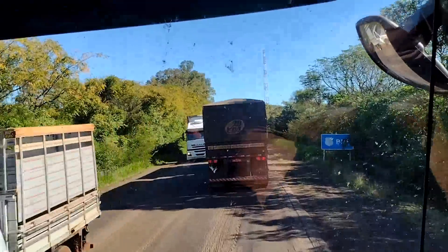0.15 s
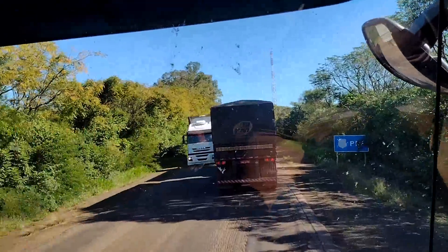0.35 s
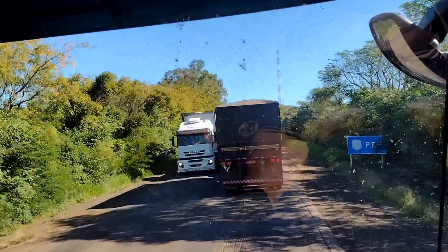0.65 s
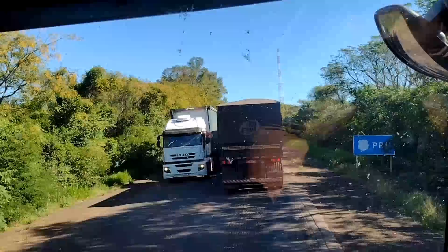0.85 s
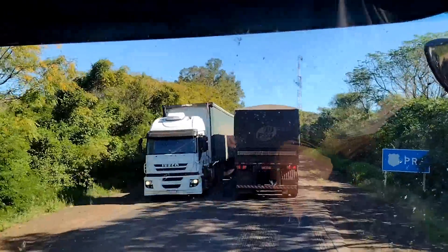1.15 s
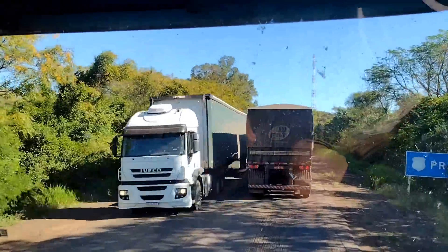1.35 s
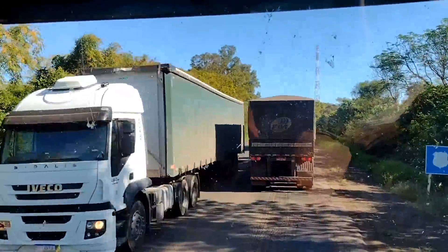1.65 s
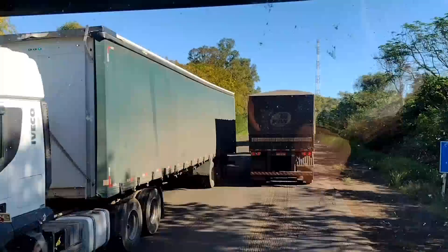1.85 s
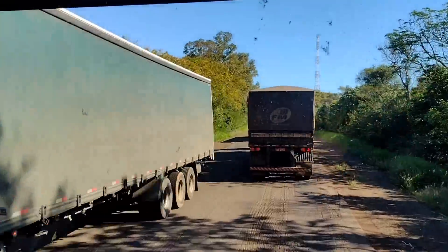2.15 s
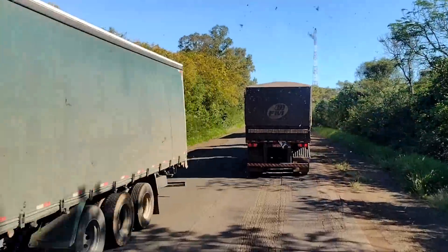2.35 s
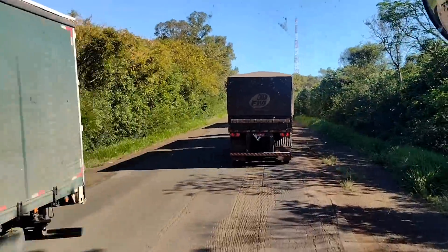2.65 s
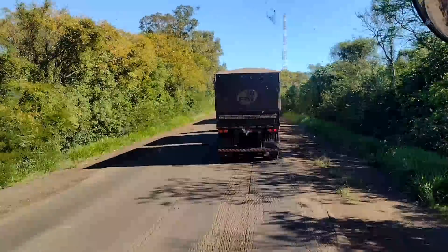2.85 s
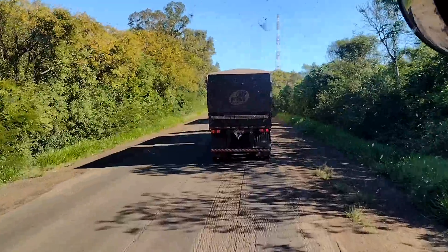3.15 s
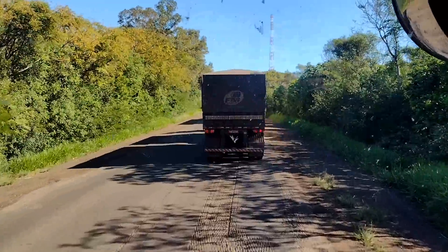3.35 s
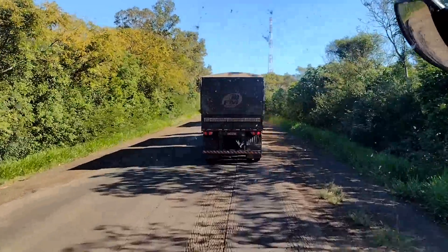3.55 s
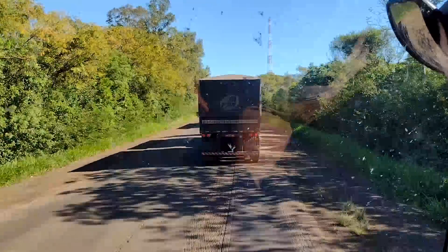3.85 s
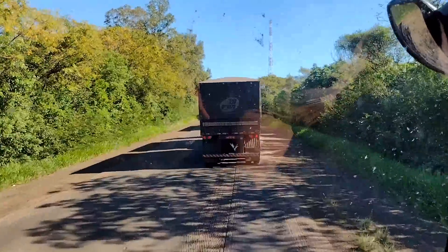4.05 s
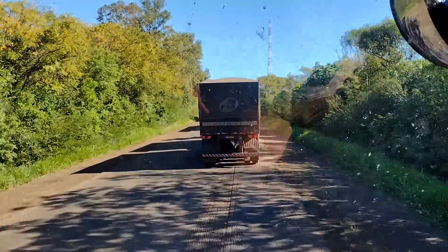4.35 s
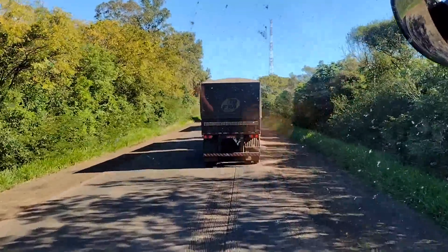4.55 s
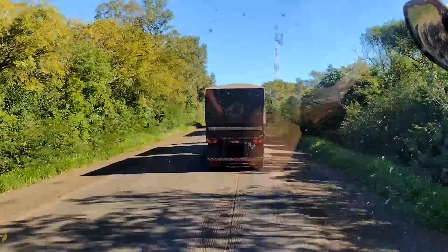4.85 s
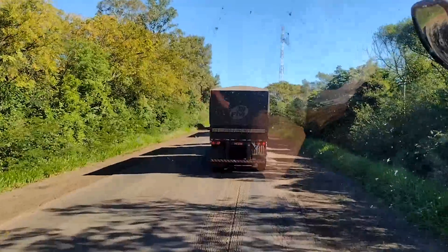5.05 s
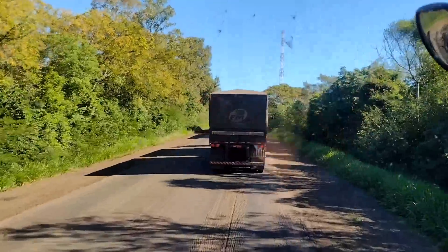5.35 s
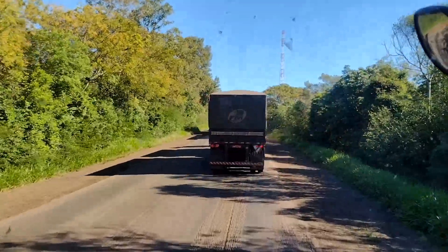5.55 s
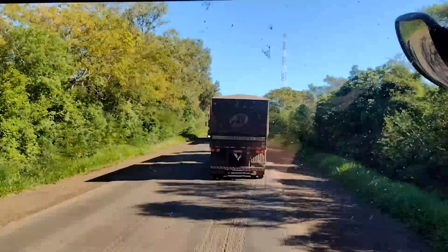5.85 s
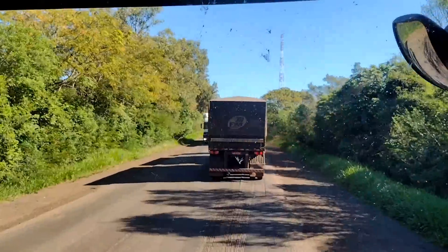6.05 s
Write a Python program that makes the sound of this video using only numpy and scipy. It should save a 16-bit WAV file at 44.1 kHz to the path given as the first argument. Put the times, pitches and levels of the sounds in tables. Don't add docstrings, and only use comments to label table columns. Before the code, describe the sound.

Deep diesel droning fills a truck cab, with rumbling floor, buzzing panels and constant faint trim chatter. An oncoming pickup sweeps by, then the engine coasts more thinly as a big truck and its trailer pass in airy roars. Power comes back with a low lurch, faint gear whine and rising pitch, punctuated by hard clicks, dull knocks and grit pings, calming to small ticks. Recorded in stereo inside the cab.

```python
import sys
import numpy as np
from scipy import signal
from scipy.fft import rfft, irfft, next_fast_len
from scipy.io import wavfile
from scipy.ndimage import uniform_filter1d, map_coordinates

SR = 44100
rng = np.random.default_rng(int(sys.argv[2]) if len(sys.argv) > 2 else 0)


def attenuation_scalar(level_db):
    decades = np.asarray(level_db, float) / 20
    return 10 ** decades


def store_pcm(level_fs):
    pcm = np.round(np.clip(level_fs, -1, 1) * 32767).astype(np.int16)
    wavfile.write(sys.argv[1], SR, np.atleast_2d(pcm).T)


N = 273861

# pitch_hz [Hz], level_db [dB per Hz]
TRIM = [(1530, -48.5), (2600, -13.5), (2790, -22), (3650, -4.5), (6250, -6.5), (8240, -2), (10100, 1.5),
        (11200, -1.5), (15200, -5.5), (16300, -27)]
LIFT_S, PRESS_S, PEDAL_S = 1.54, 3.37, 0.022


def unit(x):
    return x / np.sqrt(np.mean(x ** 2) + 1e-20)


def clock():
    return np.arange(N) / SR


def along(points, hz):
    f, v = np.transpose(points)
    return np.interp(np.log(hz + 1), np.log(f + 1), v)


def curves(rows):
    s, *cols = np.transpose(rows)
    return [np.interp(clock(), s, c) for c in cols]


def wobble(rate):
    knots = rng.standard_normal(int(N * rate / SR) + 4)
    return map_coordinates(knots, [np.arange(N) * rate / SR])


def filtered(x, response):
    m = next_fast_len(x.shape[-1] + 4096)
    spectrum = rfft(x, m) * response(np.fft.rfftfreq(m, 1 / SR))
    return irfft(spectrum, m)[..., :x.shape[-1]]


def peak(hz, centre_hz, width_hz):
    return 1j * hz * width_hz / (centre_hz ** 2 - hz ** 2 + 1j * hz * width_hz)


def resonance(centre_hz, width_hz):
    return lambda hz: peak(hz, centre_hz, width_hz) ** 2


def colour(points):
    return lambda hz: attenuation_scalar(along(points, hz))


def ports(gain, count, patchy_db=0):
    # pitch_hz [Hz], likeness [0-1]
    alike = [(60, 0.99), (130, 0.99), (290, 0.69), (640, 0.79), (1400, 0.26), (3100, 0.048), (15000, 0.12)]
    lag_s = 0.0003906
    z = signal.stft(rng.standard_normal((2, count + 512)), nperseg=256)[2]
    field = uniform_filter1d(rng.standard_normal(z.shape[1:]), size=5, axis=0)
    field = uniform_filter1d(field, size=12, axis=1)
    pair = signal.istft(z * attenuation_scalar(patchy_db * unit(field)), nperseg=256)[1]

    def share(hz):
        turn = np.arccos(np.clip(along(alike, hz), -1, 1)) / 2
        return gain(hz) * [np.cos(turn), np.sin(turn)]

    def delay(hz):
        return np.exp(-2j * np.pi * hz * lag_s * hz ** 2 / (hz ** 2 + 330 ** 2))

    common, differing = filtered(pair, share)
    late = filtered(common - differing, delay)
    return unit(np.array([common + differing, late])[:, 256:256 + count])


def place(out, s, sound):
    start = round(s * SR)
    out[:, start:start + sound.shape[1]] += sound


def throttle():
    return 1 - np.interp(clock(), [LIFT_S, LIFT_S + PEDAL_S, PRESS_S - PEDAL_S, PRESS_S], [0, 1, 1, 0])


def passing():
    # alongside_s [s], gone_s [s], approach [dB/s], leaving [dB/s], roar_db [dB]
    passes = [
        (.64, .74, 26, 28, -46.5),
        (2.19, 2.44, 94, 30, -50),
        (2.7, 3.0, 25, 55, -52),
    ]
    t, power = clock(), 0
    for near, gone, up, down, db in passes:
        level_db = db + 1.0 - up * np.maximum(near - t, 0) - down * np.maximum(t - gone, 0)
        power = power + attenuation_scalar(level_db) ** 2
    return np.sqrt(power)


def engine():
    # time_s [s], firing_hz [Hz], boom_db [dB]
    firing = [(0.0, 50.57, -22.5), (0.6, 50.94, -20), (1.15, 50.05, -21), (1.42, 51.16, -22),
              (1.56, 47.5, -26.5), (1.7, 45.03, -22.5), (1.99, 48.34, -29.5), (2.15, 47.96, -23),
              (2.42, 48.64, -30), (2.78, 47.44, -25.5), (3.3, 46, -27.5), (3.44, 51.4, -15.5),
              (3.51, 53.42, -22.5), (3.8, 55.32, -25), (4.25, 55.98, -22.5), (4.65, 57.06, -16.5),
              (5.4, 57.52, -16), (6.21, 59.27, -17)]
    # multiple [of firing rate], level_db [dB under the 2nd order]
    uneven = [
        (.5, -29.5),
        (1.5, -17),
        (2.5, -19),
        (4, -29),
    ]
    # from_s [s], in_step_s [s], slower [share], level_db [dB]
    shaft = [
        (0, 0.937, 0.092, -31),
        (1.5, 2.085, 0.1, -40.5),
        (3.394, 3.978, .095, -36),
    ]
    cab_hz = 52.5
    full_s, full_db = 4.3, 2
    t = clock()
    hz, first_db = curves(firing)
    phase = 2 * np.pi * np.cumsum(hz + 0.26 * wobble(9)) / SR + np.pi / 2
    lag = (hz - 53.5) / 4
    changes_s = [row[0] for row in shaft[1:]]
    gear = np.searchsorted(changes_s, t)
    engaged = np.prod([np.clip(abs(t - s) / PEDAL_S, 0, 1) for s in changes_s], axis=0)
    slip = np.choose(gear, [share * (phase - phase[round(s * SR)]) for _, s, share, _ in shaft])
    shaft_db = np.take([row[3] for row in shaft], gear)
    coast = 1 - throttle()
    jolt = np.exp(-((t - PRESS_S - .03) / 0.051) ** 2)
    below_hz = np.minimum(hz - cab_hz, 0)
    second_db = first_db - 10.5 + 2.5 * below_hz - 19 * coast
    second_db += (1.3 - 0.38 * below_hz) * engaged * np.cos(slip + 0.52)
    second_db -= full_db * np.interp(t, [full_s - PEDAL_S, full_s + PEDAL_S], [1, 0])
    third_db = -44 - 14.5 * coast + 10.5 * jolt
    boom = attenuation_scalar(first_db + (-1.27 + 1.5 * coast) * wobble(30)) * np.cos(phase)
    boom += attenuation_scalar(shaft_db) * engaged * np.cos(phase - slip)
    boom += attenuation_scalar(second_db + 0.28 * wobble(24)) * np.cos(2 * phase - lag)
    boom += attenuation_scalar(third_db + .8 * wobble(14)) * np.cos(3 * phase - lag - np.pi / 2)
    for k, db in uneven:
        boom += attenuation_scalar(second_db + db + 0.95 * wobble(16)) * np.cos(k * phase + 2.3 * wobble(7.1))
    return np.sqrt(2) * boom, phase


def road(phase):
    # pitch_hz [Hz], level_db [dB per Hz]
    floor = [(2, -23), (8, -3), (14, -2.5), (23, -1.5), (32, -13.5), (42, -10), (62, -10), (72, -13),
             (88, -22), (118, -15), (150, -18.5), (200, -27.5), (260, -36), (500, -100)]
    # pitch_hz [Hz], level_db [dB per Hz]
    panels = [(110, -32), (180, -5), (334, -8), (428, -9.5), (569, -18), (1010, -17), (1190, -20),
              (1400, -31.5), (1820, -60), (3080, -120)]
    # time_s [s], spread_s [s], extra_rumble_db [dB], extra_drum_db
    # [dB]
    bumps = [(.55, 0.4, 3.5, -18), (1.0, 0.076, 1, 2), (1.2, .1, -3, 0), (.73, .04, 4, 0),
             (1.42, 0.17, 5, 5.5), (1.95, 0.055, -2, -2.5), (2.85, 0.18, 5, 3), (3.75, 0.23, -2.5, 3.5),
             (3.93, 0.055, 7, 7), (4.4, 0.043, -2, 8.5), (4.65, 0.043, -5, 5), (5.46, .07, -17, 0.5),
             (5.7, 0.21, 2, 2.5), (5.98, 0.078, -1, 4.5), (.12, .15, -0.5, 5.5), (1.7, .1, -1, -0.5),
             (2.7, .04, -5, -4), (3.27, 0.089, 3.5, -3.5), (4.2, 0.089, 2.5, 1)]
    t = clock()
    rumble_db, drum_db = np.full(N, -29.0), np.full(N, -50.5)
    for s, spread, more_rumble, more_drum in bumps:
        swell = np.exp(-((t - s) / spread) ** 2)
        rumble_db += more_rumble * swell
        drum_db += more_drum * swell

    def floor_and_hum(hz):
        return attenuation_scalar(along(floor, hz)) + attenuation_scalar(-15) * abs(peak(hz, 112, 16)) ** 2

    rumble = attenuation_scalar(rumble_db + 1.5 * wobble(11)) * ports(floor_and_hum, count=N)
    beat = unit(1 + 0.19 * np.cos(phase))
    shaken = np.hypot(attenuation_scalar(drum_db), attenuation_scalar(1.5) * passing())
    drum = shaken * attenuation_scalar(3 + 1.4 * wobble(12)) * beat * ports(colour(panels), count=N, patchy_db=2.0)
    whine_db = -52.5 - 36 * (1 - throttle()) - 7 * (t < (LIFT_S + PRESS_S) / 2)
    swells = unit(1 + .45 * np.cos(phase / 2))
    whine = attenuation_scalar(whine_db + 1.8 * wobble(30)) * swells * ports(resonance(1185, 85), count=N)
    return rumble + drum + whine


def traffic():
    # pitch_hz [Hz], level_db [dB per Hz]
    tyres = [(290, -30.5), (500, 0.5), (571, -6.5), (715, -6.5), (1080, -3.5), (1140, -7.5), (1870, -8.5),
             (2060, -9), (3200, -26), (4160, -46), (7040, -120)]
    # pitch_hz [Hz], level_db [dB per Hz]
    rush = [(1530, -39), (2600, -11), (3250, -4.5), (4060, 0.5), (4960, -5), (5520, -3), (6690, -4.5),
            (9760, 1.5), (15100, -11), (15750, -15), (16300, -29)]
    # time_s [s], level_db [dB]
    wind = [(0, -51.5), (.3, -62), (1.05, -73.5), (1.35, -55), (2.1, -59), (2.2, -51), (2.45, -56.5),
            (2.56, -70), (2.72, -54), (3.15, -62), (3.3, -62.5), (3.6, -59), (3.9, -60), (4.05, -67),
            (6.21, -64.5)]
    wind_db, = curves(wind)
    shake = wobble(14)
    rolling = np.hypot(attenuation_scalar(-59), passing())
    roar = rolling * attenuation_scalar(6.0 + 0.85 * shake) * ports(colour(tyres), count=N, patchy_db=2.0)
    flow = np.hypot(attenuation_scalar(wind_db), attenuation_scalar(-0.5) * passing())
    hiss = flow * attenuation_scalar(1.2 + 1.3 * shake + .8 * wobble(45)) * ports(colour(rush), count=N, patchy_db=.9)
    return roar + hiss


def rattle():
    per_s, level_db, spread_db, puff_s = 110, -71, 2.5, .002
    gaps, force = rng.random((900, 2)).T
    at = (np.cumsum(-np.log(1 - gaps)) / per_s * SR).astype(int)
    blows = np.bincount(at, attenuation_scalar(-spread_db * np.log(1 - force)), minlength=N)[:N]
    t = np.arange(SR // 20) / SR / puff_s
    puffs = signal.fftconvolve(blows, t * np.exp(1 - t))[:N]

    def chatter(hz):
        return attenuation_scalar(along(TRIM, hz)) * (1 + 4.5 * abs(peak(hz, 3800, 1200)))

    return attenuation_scalar(level_db) * puffs * ports(chatter, count=N)


def squeaks():
    # start_s [s], length_s [s], pitch_hz [Hz],
    # width_hz [Hz], level_db [dB]
    rubs = [(0.0, .085, 5000, 200, -61), (.02, .05, 7400, 300, -59), (.01, .06, 10000, 250, -61),
            (.09, .14, 4200, 200, -57), (.15, .13, 3800, 200, -60), (0.0, .12, 2500, 150, -58),
            (.17, .06, 7200, 600, -57), (.54, .2, 2450, 200, -49), (.64, .18, 2350, 200, -47),
            (.76, .17, 2250, 200, -51), (.58, .16, 3800, 200, -56), (.78, .05, 3350, 250, -50),
            (1.25, .14, 2330, 190, -55), (1.38, .2, 2270, 170, -56), (1.55, .14, 2450, 200, -58),
            (1.05, .48, 1185, 70, -52), (1.29, .11, 4520, 180, -57), (1.62, .08, 4120, 150, -62),
            (1.36, .15, 12800, 400, -54), (1.54, .14, 1990, 90, -57), (1.6, .1, 7500, 300, -61),
            (2.17, .36, 1880, 110, -52), (2.19, .08, 1480, 120, -51), (2.3, .4, 1500, 150, -57),
            (2.42, .85, 740, 130, -46.5), (2.71, .11, 1930, 110, -46), (2.88, .11, 1940, 80, -46),
            (3.18, .04, 12500, 600, -60), (3.99, .11, 10100, 90, -66), (4.11, .065, 10100, 250, -61)]
    # start_s [s], length_s
    # [s], pitch_hz [Hz], width_hz [Hz], level_db [dB]
    scuffs = [(0.083, 0.42, 208, 60, -41.5), (0.59, 0.14, 4300, 4030, -41.5), (1.19, 0.14, 6000, 8000, -54),
              (2.047, 0.39, 145.2, 50, -39), (2.727, 0.069, 4830, 6200, -47.5),
              (3.039, 0.1, 5800, 7150, -51), (3.902, 0.052, 790, 350.3, -49.5),
              (4.098, 0.066, 9386, 8920, -55.5), (4.269, 0.068, 6284, 3920, -50),
              (3.599, 0.093, 1480, 700, -53.5), (0.6, 0.12, 9000, 5000, -44.5),
              (.46, 0.077, 8800, 4000, -45.5), (.76, .1, 8500, 5800, -45.5), (3.6, .065, 560, 300, -39),
              (0.0, .45, 2000, 1200, -55), (2.14, .3, 10000, 7000, -51), (.5, .42, 2200, 800, -51)]
    # start_s [s], length_s [s]
    whistles = [(2.98, .34), (3.98, .1), (4.16, .1), (4.9, .08), (5.12, .2), (5.93, .28)]
    out = np.zeros((2, N + SR))
    seal = [(*row, 14000, 60, -73) for row in whistles]
    for s, length, centre_hz, width_hz, db in rubs + scuffs + seal:
        n = round(length * SR)
        tone = ports(resonance(centre_hz, width_hz), count=n)
        place(out, s, attenuation_scalar(db) * np.hanning(n) ** (1 / 3) * tone)
    return out[:, :N] * attenuation_scalar(2.4 * wobble(45))


def knocks():
    # time_s [s], peak_db [dB], pitch_hz [Hz]
    blows = [(0.158, -27.5, 407), (.418, -31.5, 495), (.959, -30.5, 449), (1.099, -28.5, 431),
             (1.292, -30.5, 387), (1.372, -28.5, 387), (1.564, -32, 654.8), (2.901, -26, 1000),
             (3.459, -31.5, 479), (3.918, -23, 500), (3.928, -30, 600), (3.945, -20, 520), (3.95, -34, 864),
             (4.343, -37, 398.8), (4.347, -35, 2200), (4.445, -30, 1350), (4.61, -32, 421.8),
             (4.634, -28, 1081), (4.656, -31.5, 1077), (4.66, -32.5, 420), (5.013, -29.5, 240),
             (5.13, -36, 600.7), (5.45, -36.5, 1695), (5.615, -30, 453), (5.663, -31, 1140),
             (5.67, -29, 990), (5.671, -26, 270), (5.959, -33, 1051), (5.96, -29, 381.4)]
    out, t = np.zeros((2, N + SR)), np.arange(SR // 6) / SR
    for s, db, panel_hz in blows:
        thud = ports(resonance(panel_hz, 0.44 * panel_hz), count=len(t))
        cycles = t * panel_hz
        place(out, s, attenuation_scalar(db - 6.5 - 60 * cycles / 45) * (1 - np.exp(-cycles)) * thud)
    return out[:, :N]


def pings():
    # time_s [s], peak_db [dB], pitch_hz [Hz], t60_s [s]
    grit = [(0.2996, -30, 12200, 0.0083), (1.5055, -42, 11000, 0.013), (1.5107, -20.5, 11100, 0.0089),
            (1.522, -41.5, 10700, 0.0099), (2.851, -39.5, 9288, 0.15), (2.9163, -15, 9700, 0.0072),
            (3.077, -43, 7450, 0.011), (3.087, -33, 6956, .012), (3.539, -30, 11950, .02),
            (3.7409, -38, 4400, 0.076), (4.3387, -32, 4700, 0.088), (1.562, -39, 800, .02),
            (4.4456, -36, 1700, .014), (5.665, -42, 1000, .02)]
    out, t = np.zeros((2, N + SR)), np.arange(SR // 10) / SR
    for s, db, mode_hz, t60 in grit:
        ring = ports(resonance(mode_hz, min(1800, 0.7 * mode_hz)), count=len(t))
        place(out, s, attenuation_scalar(db - 60 * t / t60) * (1 - np.exp(-t / 0.00059)) * ring)
    return out[:, :N]


def ticks():
    # time_s [s], peak_db [dB], low_db [dB, share under 3 kHz], brightest_hz [Hz]
    contacts = [(0.399, -23.5, -6.5, 9150), (0.463, -25.5, -30, 10200), (0.498, -22.5, -44, 8500),
                (0.522, -23, -21, 11300), (0.783, -26, -18, 9900), (0.8217, -31.5, -9, 11380),
                (0.843, -31, -33, 11300), (0.952, -16.5, -13.5, 10300), (0.9805, -29, -22, 11100),
                (1.0377, -26, -31, 9290), (1.0956, -28, -16, 10000), (1.0971, -12.5, -14, 10400),
                (1.1386, -35, -23, 11200), (1.3682, -35.5, -5, 4555), (1.68, -34, -11.5, 9350),
                (2.916, -22.5, -31, 9610), (3.1495, -39.5, -1, 4040), (3.536, -29.5, -36, 10110),
                (3.707, -31.5, -32, 12900), (3.739, -23, -15.5, 7500), (3.8234, -11, -24, 9200),
                (3.8405, -26.5, -13, 9240), (3.854, -29, -22, 9000), (3.8775, -32.5, -3, 8010),
                (3.907, -21, -21, 8480), (3.919, -17.5, -9.5, 4800), (3.9316, -19, -19, 9500),
                (3.9424, -17.5, -14, 10100), (4.339, -14, -13.5, 7920), (4.3593, -49, -19, 10290),
                (4.3894, -51, 2, 9494)]
    # time_s [s], peak_db [dB], brightest_hz [Hz]
    faint = [(1.812, -38.5, 9417), (2.019, -40, 8580), (2.071, -43, 8550), (4.0003, -51.5, 5029),
             (4.2047, -46.5, 10130), (4.7136, -45.5, 6660), (4.7836, -45, 10090), (4.8819, -40.5, 10030),
             (4.991, -47, 7700), (5.1083, -49.5, 5174), (5.293, -44, 11030), (5.3944, -45, 5218),
             (5.456, -42, 5142), (5.506, -52, 9550), (5.5465, -49, 8693), (5.634, -44.5, 5080),
             (5.691, -43.5, 10190), (5.801, -43.5, 7632), (5.8453, -45, 7400), (6.0343, -42, 8400),
             (6.1059, -49, 8160), (6.136, -46, 10100), (.6, -40, 9000), (.639, -35, 10000),
             (1.277, -43, 9300), (1.348, -39, 6013), (1.695, -38.5, 5000), (2.43, -37.5, 4510),
             (3.0604, -41, 4270), (3.257, -49, 8000), (3.527, -42, 9024), (3.637, -46.5, 4998),
             (4.1046, -49, 9850), (4.1215, -43, 9900), (4.149, -45.5, 5530), (4.69, -48.5, 3993),
             (4.9985, -46.5, 4400), (5.792, -50, 10000), (6.0, -57, 6000), (6.155, -54, 10000),
             (.762, -42, 11000)]
    out, t = np.zeros((2, N + SR)), np.arange(SR // 8) / SR
    fade = attenuation_scalar(-60 * t / 0.076)
    crack = 0.85 * attenuation_scalar(-60 * t / 0.033)
    for s, db, low_db, bright_hz in contacts + [(s, db + 2.5, -16, hz) for s, db, hz in faint]:
        pan_db = 2 * rng.standard_normal()
        plain = .6 if db < -34 else 1

        def bright(hz):
            spot = plain + 0.75 * abs(peak(hz, bright_hz, 2500)) ** 2
            return attenuation_scalar(along(TRIM, hz)) * spot / np.hypot(1, (hz / 15000) ** 3)

        def sizzle(hz):
            return attenuation_scalar(along(TRIM, hz)) * abs(peak(hz, 13000, 6000)) ** 2

        high = ports(bright, count=len(t), patchy_db=1.0)
        low = ports(resonance(1600, 1900), count=len(t))
        top = ports(sizzle, count=len(t))
        rise = 1 - np.exp(-t / (0.0021 if db > -32 else 0.0022))
        burst = (fade + 0.8 * crack) * high + crack * top
        burst += attenuation_scalar(low_db + 3.5 - 60 * t / 0.1) * low
        place(out, s, attenuation_scalar(db - 8.5) * attenuation_scalar([[pan_db / 2], [-pan_db / 2]]) * rise * burst)
    return out[:, :N]


def scene():
    boom, phase = engine()
    return boom + road(phase) + traffic() + rattle() + squeaks() + knocks() + pings() + ticks()


def band_limit(x):
    return signal.sosfilt(signal.butter(12, 16480, fs=SR, output="sos"), x)


def record(dry):
    # pitch_hz [Hz], left_over_right_db [dB]
    lean = [(60, -1.54), (200, -3.5), (380, 0), (1300, -4), (4400, -1.5), (8100, -0.5), (15000, -1)]

    def microphone(hz):
        return attenuation_scalar(along(lean, hz) / 2 * [[1], [-1]]) * (hz < 15800)

    return band_limit(filtered(dry, microphone))


dry = scene()
out = record(dry)
store_pcm(out)
```